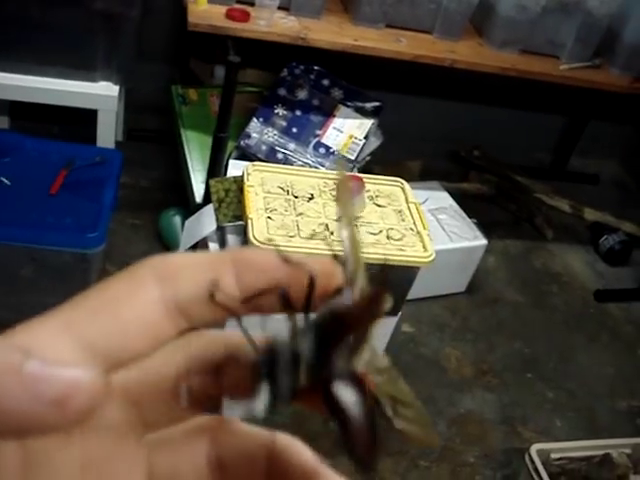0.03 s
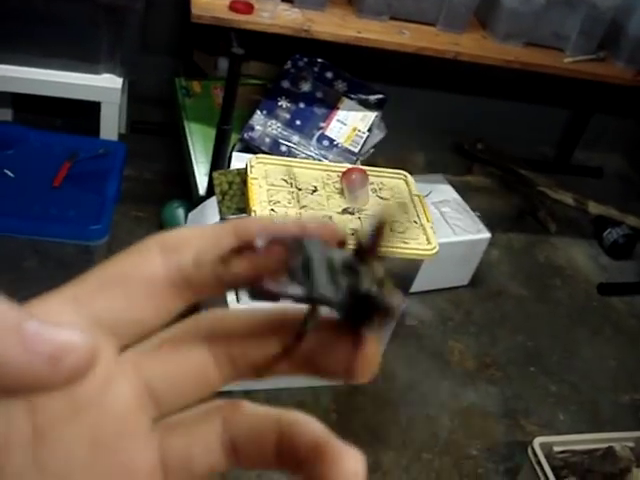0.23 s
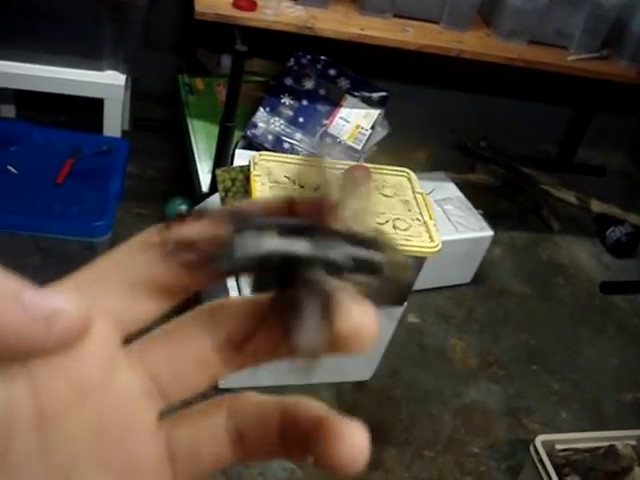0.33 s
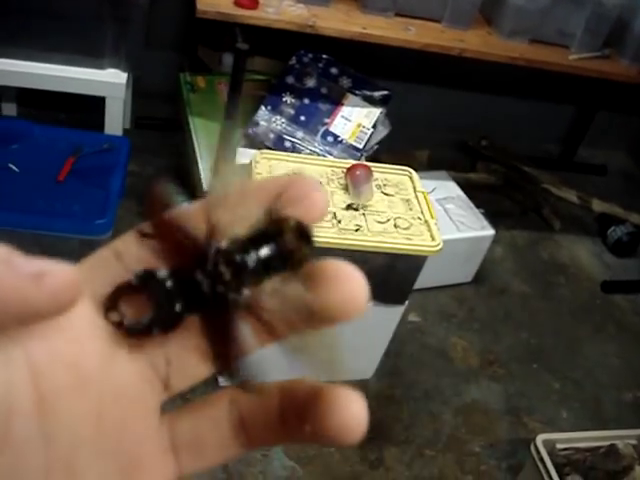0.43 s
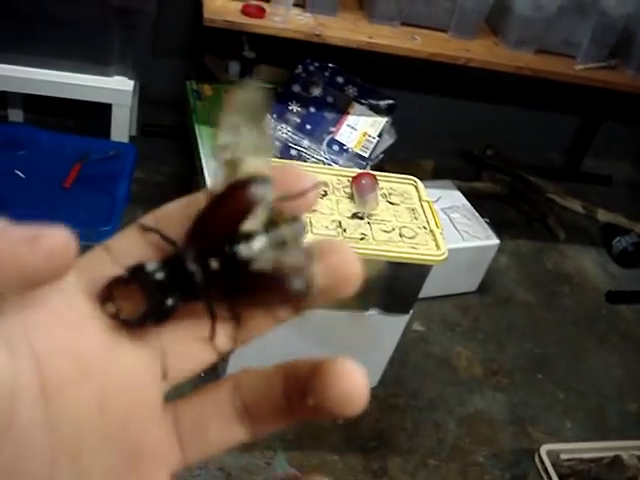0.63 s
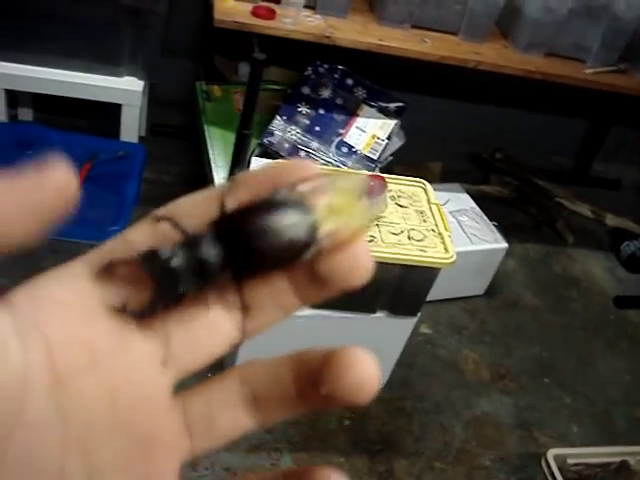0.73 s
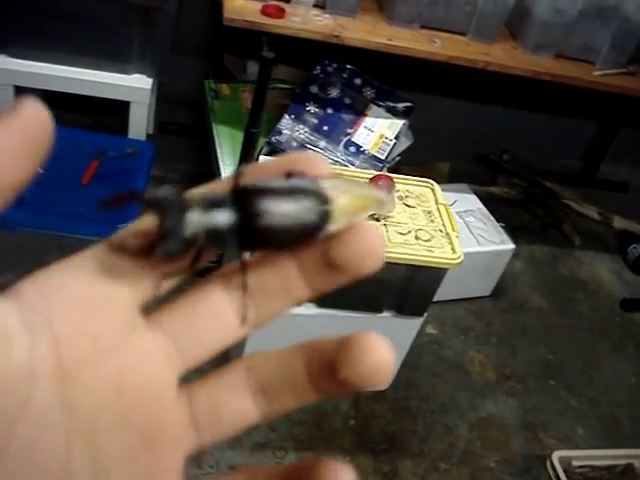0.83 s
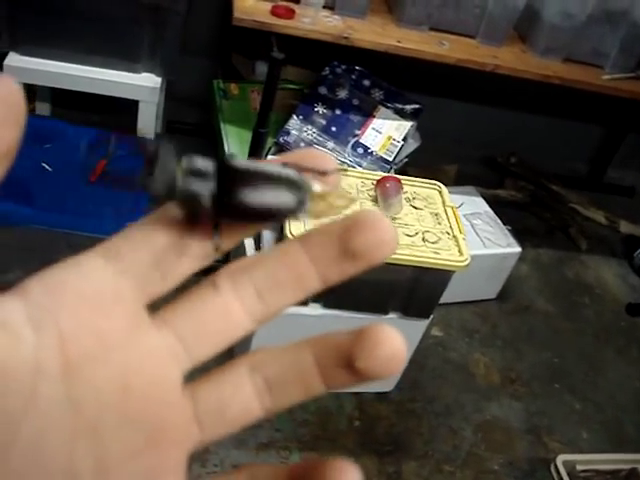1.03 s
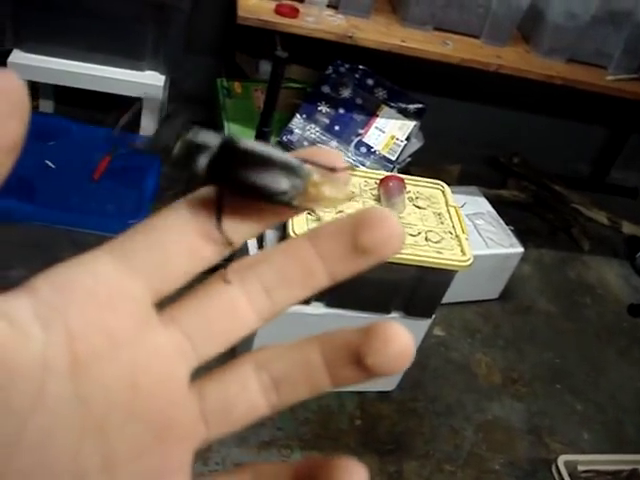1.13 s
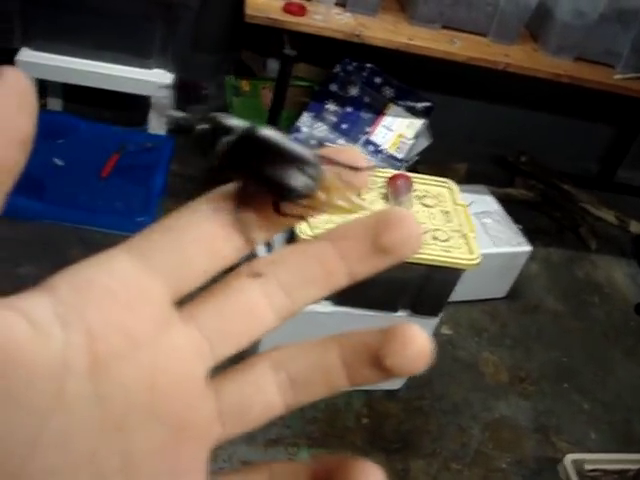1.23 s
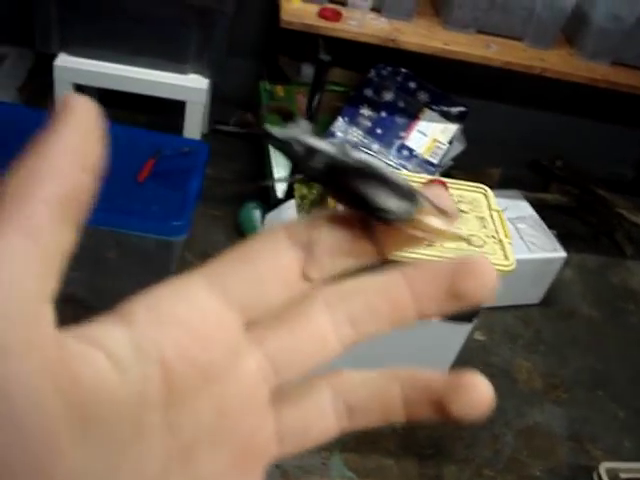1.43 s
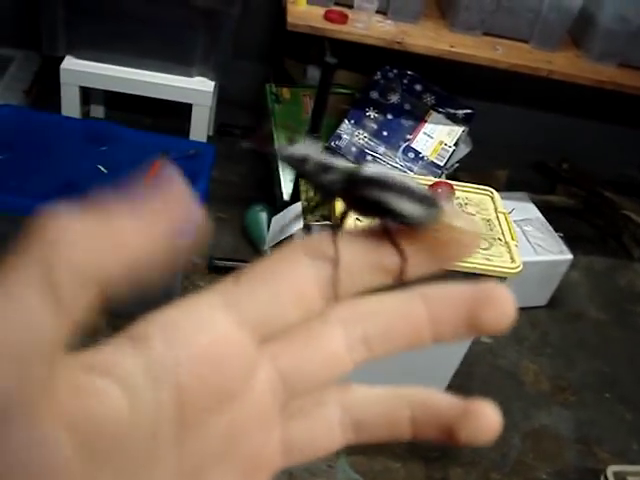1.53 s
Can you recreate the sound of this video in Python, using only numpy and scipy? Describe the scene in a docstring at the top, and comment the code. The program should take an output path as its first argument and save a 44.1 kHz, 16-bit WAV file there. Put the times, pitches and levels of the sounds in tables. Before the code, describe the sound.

Steady dull hiss in a quiet workroom. At about 0.2 seconds a large beetle close to the microphone beats its wings, around 43 snapping, papery strokes per second, loudest from 0.27 to 0.45, with soft air thumps and small knocks. By 0.55 it weakens into scratchy folding ticks, ending near 0.64. A short room echo fades; barely audible shell taps follow near 0.9, 1.0 and 1.4.

```python
"""A large beetle on a hand beats its wings about 43 times a second, close to a small microphone in a quiet workroom.
On each stroke the two stiff wings act up to a few milliseconds apart: clicks excite a snap, shaped noise a crinkle.
Air pulses from some strokes reach the microphone, noise makes a dull swish, and decaying modes make knocks and taps.
The beats weaken into scratchy ticks as the wings fold; decaying noise makes the room's echo, over a steady hiss."""
import sys
import numpy as np
from scipy import signal
from scipy.fft import rfft, irfft
from scipy.io import wavfile

SR = 44100
rng = np.random.default_rng(int(sys.argv[2]) if len(sys.argv) > 2 else 0)


def unload_audio(sound):
    """Save the sound as a 16-bit wav file, at the path given as the first command line argument."""
    columns = np.transpose(np.atleast_2d(sound))
    # keep every value between -1 and 1, then stretch to whole-number steps
    steps = np.round(np.clip(columns, -1, 1) * 32767)
    wavfile.write(sys.argv[1], SR, steps.astype(np.int16))


N = 70560  # samples, 1.6 s

# All levels are relative unless stated otherwise.
# steady hiss of room and microphone: [f/Hz, spectral level/dB per Hz]
HISS_SPECTRUM = [(15, -40), (25, -25), (59, -7), (145, -2), (245, -0.5), (331, 0), (482, -1), (775, -3.5),
                 (924, -4.5), (2170, -10.5), (2580, -11), (7590, -17), (10000, -22), (13000, -82),
                 (22000, -120)]
# colour of the air stirred between snaps: [f/Hz, level/dB]
SWISH_SPECTRUM = [(40, -14.5), (120, 2), (300, 2.5), (450, -2), (700, -13), (2500, -9), (6000, -33),
                  (10000, -44)]
# course of that swish: [t/s, level/dB]
SWISH_LEVEL = [(.19, -60), (.23, -34), (0.301, -26.5), (.35, -26), (.45, -34.5), (.5, -41)]
# wing strokes: [t/s, snap level/dB, crinkle level/dB, crinkle fade/s,
#                other wing's scratch t/s, its level/dB, treble lift/dB]
STROKES = [(0.2021, -45, -14, 0.00079, .2008, -18, -5), (0.2258, -7, -1.5, 0.0012, .2282, -10.5, -1.5),
           (0.251, -8, -6, 0.00077, .2511, -5.5, -5), (.2710, 0, 2, 0.0034, .274, -1, 0),
           (0.2942, -1.5, 1.5, .002, .2967, -7.5, -1), (0.3181, 0.5, 4.5, 0.0014, .3212, -2, 0),
           (0.3425, 3.5, 0, 0.0011, .3458, 2, 0.5), (0.3656, 2.5, 1.5, 0.0014, .3689, 4, -1),
           (0.3892, 2.5, -3, 0.0071, .3926, -8, 2), (0.4135, -1, 3.5, 0.0013, .4105, 3, -0.5),
           (0.4356, -1, -1, 0.011, .4327, -2, 0), (0.4578, -5.5, -1, 0.0014, .4547, 0.5, 0),
           (0.4825, -7, -0.5, 0.0057, .4816, 1, -2), (.5050, -8, -6, 0.0029, .5018, -3, 1.5),
           (0.5244, -14, -8, .003, .5293, -4, -1), (.5571, -16, -8.5, .002, .5577, -12, -1.5)]
# colour of a snap: [f/Hz, level/dB]
SNAP_SPECTRUM = [(60, -13), (250, -2), (650, -2.5), (1100, -7.5), (1800, -2), (2900, 0), (3500, -3),
                 (4400, 4.5), (5200, -5), (6200, -4), (8000, -7.5), (10000, -9.5)]
# colour of the crinkling membrane: [f/Hz, level/dB]
CRINKLE_SPECTRUM = [(60, 2.5), (280, 0.5), (650, 0.5), (1100, 1.5), (1800, -3), (2900, -0.5), (4300, 1),
                    (6000, 1), (8000, -1.5), (10000, -5)]
# colour of the room's echo: [f/Hz, level/dB]
ROOM_SPECTRUM = [(50, -18.5), (130, -5), (330, -3.5), (650, -1.5), (1100, -1), (2200, 0), (4300, -6.5),
                 (7000, -12.5), (10000, -17.5)]
# reverberation time of the room: [f/Hz, t60/s]
ROOM_DECAY = [(100, .4), (500, 0.62), (2000, 0.53), (5000, 0.72), (10000, 0.85)]
# strokes that knock the wing cases: [t/s, level/dB]
KNOCKS = [(.2503, -26), (.3689, -23), (.4353, -23.5)]
# modes of the wing cases: [f/Hz, level/dB, t60/s]
CASE_MODES = [(1040, -0.5, 0.018), (1380, -4, .016), (2160, -3.5, 0.017)]
# strokes whose air reaches the microphone: [t/s, level/dB, rise/s]
PUFFS = [(0.2723, 0.5, 0.00039), (0.343, -2, 0.0015), (0.3664, 0.5, 0.0012), (0.3895, -1, 0.0014),
         (0.4136, 2.5, 0.00095), (0.4355, 3.5, 0.0017), (0.4579, -2, 0.0013)]
# scratchy ticks of folding wings and claws: [t/s, level/dB]
TICKS = [(0.4703, 0), (0.4769, -2.5), (0.4935, -2), (0.5165, -7.5), (0.537, -9), (.546, -17), (.5818, -16),
         (0.6083, -19), (0.6377, -20)]
# colour of the folding, applied on top of the snap and crinkle colours: [f/Hz, level/dB]
FOLDING_SPECTRUM = [(100, -10), (400, -4), (1000, 2), (3500, -0.5), (6000, 0), (10000, 1)]
# faint taps of the shell: [t/s, level/dB]
TAPS = [(.6375, -36), (.9135, -44), (1.006, -52), (1.4144, -51)]
# modes of the shell: [f/Hz, level/dB, t60/s]
SHELL_MODES = [(2120, -1, .045), (1880, -7, 0.033), (3300, -11, .03), (3770, -8, 0.035)]

HISS_DB = -51.5  # rms re full scale, ahead of the microphone
SNAP_DB, CRINKLE_DB, PUFF_DB, ROOM_DB = 1, -21.5, -23.5, -4
BUCKLE_S, BUCKLE_SHARE = 0.00045, 0.46  # mean delay and mean size of the second buckle
BEND_S, BEND_DB = 0.00089, -7.5  # the membrane rustles as it bends before the snap
HOLD_S, GRAIN_DB = 0.00081, 2  # hold of the crinkle, spread of its grains
SCRATCH_FADE_S, SCRATCH_CLICK_DB = 0.0013, -8.5  # the other wing and the ticks scratch more than they click
TREBLE_HZ = 3000  # above this, a stroke is brighter or duller with the angle of the wing
ROOM_GAP_S, ROOM_BUILD_S = 0.0062, 0.0036
FOLD_S, FOLD_WIDTH_S, FOLD_DB = 0.508, 0.065, -11.5  # the wings rub as they fold
MIC_LOW_HZ = 7.5
MIC_SMEAR_HZ, MIC_POLE_RADIUS = 5200, 0.79  # the microphone's port delays the treble near this pitch
EDGE_HZ = 10120


def amp(db):
    """Level definition: 20 dB is a tenfold amplitude."""
    return 10 ** (np.asarray(db) / 20)


def unit(x):
    """Normalization to an rms of 1."""
    return x / np.sqrt(np.mean(x ** 2) + 1e-20)


def read(points, hz):
    """Linear interpolation of a table along log frequency."""
    f, value = np.transpose(points)
    return np.interp(np.log(hz + 1), np.log(f + 1), value)


def add(mix, s, sound):
    """Superposition: a sound starting at s seconds is added to the mix in place."""
    part = mix[max(round(s * SR), 0):][:len(sound)]
    part += sound[:len(part)]


def colour(x, points, size=4096):
    """Minimum-phase filtering: the Hilbert transform of the log gain gives the phase of a causal filter."""
    hz = abs(np.fft.fftfreq(size, 1 / SR))
    log_gain = np.log(amp(np.maximum(read(points, hz), -100)))
    response = np.exp(np.conj(signal.hilbert(log_gain)))
    taps = np.fft.ifft(response).real
    return signal.fftconvolve(x, taps[:size // 2])[:len(x)]


def hiss():
    """Stationary noise: a white spectrum weighted by a fixed spectral density."""
    spectrum = rfft(rng.standard_normal(N))
    gain = amp(read(HISS_SPECTRUM, np.fft.rfftfreq(N, 1 / SR)))
    return amp(HISS_DB) * unit(irfft(spectrum * gain, N))


def swish():
    """Flow noise: the air stirred by the beating wings is dull noise of varying level."""
    s, db = np.transpose(SWISH_LEVEL)
    level = np.interp(np.arange(N) / SR, s, amp(db), left=0, right=0)
    return level * colour(rng.standard_normal(N), SWISH_SPECTRUM)


def snap(db):
    """Buckling of a stiff sheet: one impulse and a weaker one of varying delay and size."""
    out = np.zeros(SR // 100)
    when, size = rng.uniform(-1, 1, 2)
    delay = int(BUCKLE_S * SR * (1 + 0.45 * when))
    out[0] = -1
    out[delay] -= BUCKLE_SHARE * (1 + 0.5 * size)
    return amp(SNAP_DB + db) * out


def crinkle(s, db, fade_s):
    """Amplitude envelope: exponential growth during bending, a jump, a brief hold and exponential decay."""
    t = np.arange(N) / SR - s
    bend = amp(BEND_DB) * np.exp(-abs(t) / BEND_S)
    fade = np.exp(-np.maximum(t - HOLD_S, 0) / fade_s)
    return amp(db) * np.where(t < 0, bend, fade)


def scratch(s, db):
    """Friction event: a weak click train and the power envelope of one short rustle."""
    clicks = np.zeros(N)
    add(clicks, s, snap(db + SCRATCH_CLICK_DB))
    return clicks, crinkle(s, db, SCRATCH_FADE_S) ** 2


def membrane(clicks, power):
    """Crackling of a thin membrane: filtered impulses plus grainy noise of the given power envelope."""
    grain_level = GRAIN_DB * np.minimum(rng.exponential(1, N), 4)
    grains = unit(rng.standard_normal(N) * amp(grain_level))
    rustle = colour(grains * np.sqrt(power), CRINKLE_SPECTRUM)
    return colour(clicks, SNAP_SPECTRUM) + amp(CRINKLE_DB) * rustle


def wings():
    """Impulsive excitation: one wing snaps and crinkles, the other scratches just before or after."""
    out = np.zeros(N)
    treble_filter = signal.butter(2, TREBLE_HZ, "highpass", fs=SR)
    for s, snap_db, crinkle_db, fade_s, other_s, other_db, lift_db in STROKES:
        clicks, power = scratch(other_s, other_db)
        add(clicks, s, snap(snap_db))
        # Incoherent rustles add in power.
        stroke = membrane(clicks, power + crinkle(s, crinkle_db, fade_s) ** 2)
        treble = signal.filtfilt(*treble_filter, stroke)
        out += stroke + (amp(lift_db) - 1) * treble
    return out


def room(x):
    """Reverberation: dense reflections build up after a short gap and decay at a rate set by frequency."""
    t = np.arange(SR) / SR
    hz, age, bands = signal.stft(rng.standard_normal(SR), SR, nperseg=256)
    decay = amp(-60 * age / read(ROOM_DECAY, hz)[:, None])
    tail = signal.istft(bands * decay, SR, nperseg=256)[1][:SR]
    tail = tail * np.clip((t - ROOM_GAP_S) / ROOM_BUILD_S, 0, 1)
    response = colour(tail / np.linalg.norm(tail), ROOM_SPECTRUM)
    return amp(ROOM_DB) * signal.fftconvolve(x, response)[:N]


def struck(hits, modes):
    """Modal vibration: each hit on a hard part of the beetle excites a sum of decaying sinusoids."""
    out, t = np.zeros(N), np.arange(SR // 10) / SR
    for s, db in hits:
        ring = np.zeros(len(t))
        for hz, mode_db, t60 in modes:
            ring += amp(db + mode_db - 60 * t / t60) * np.sin(2 * np.pi * hz * t)
        add(out, s, ring)
    return out


def puffs():
    """Pressure pulse: each push of air is a one-sided swell that leaks away through a high-pass."""
    out, t = np.zeros(N), np.arange(SR // 20) / SR
    for s, db, rise_s in PUFFS:
        swell = t / rise_s * np.exp(1 - t / rise_s)
        add(out, s, amp(PUFF_DB + db) * swell)
    leak = signal.butter(2, MIC_LOW_HZ, "highpass", fs=SR, output="sos")
    return signal.sosfilt(leak, out)


def folding():
    """Friction of folding wings: separate ticks over a rub that swells and subsides as a Gaussian."""
    clicks, power = np.sum([scratch(s, db) for s, db in TICKS], axis=0)
    t = np.arange(N) / SR
    rub = amp(FOLD_DB) * np.exp(-((t - FOLD_S) / FOLD_WIDTH_S) ** 2)
    return colour(membrane(clicks, power + rub ** 2), FOLDING_SPECTRUM)


def scene():
    """Superposition of the near beetle, its echo, the moving air and the background."""
    beetle = wings() + struck(KNOCKS, CASE_MODES) + folding() + struck(TAPS, SHELL_MODES)
    return (beetle + room(beetle) + swish() + puffs() + hiss())[None]


def record(dry):
    """All-pass dispersion: the microphone smears clicks without altering levels; a low-pass limits the band."""
    r = MIC_POLE_RADIUS
    poles = np.array([1, -2 * r * np.cos(2 * np.pi * MIC_SMEAR_HZ / SR), r ** 2])
    heard = signal.lfilter(poles[::-1], poles, dry)
    low_pass = signal.firwin(201, EDGE_HZ, window=("kaiser", 7), fs=SR)
    return signal.oaconvolve(heard, low_pass[None], "same")


dry = scene()
out = record(dry)
unload_audio(out)
```